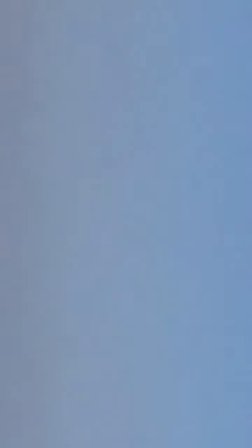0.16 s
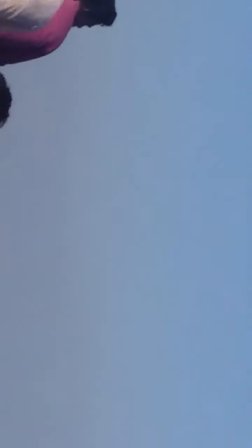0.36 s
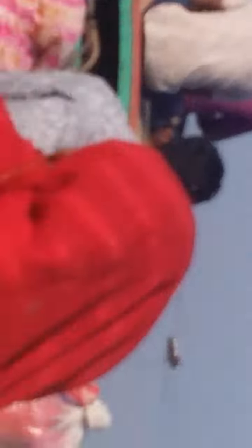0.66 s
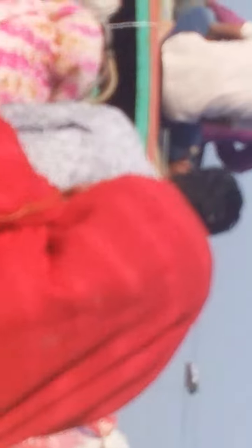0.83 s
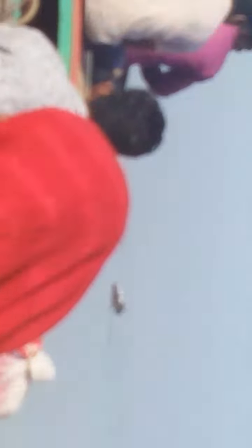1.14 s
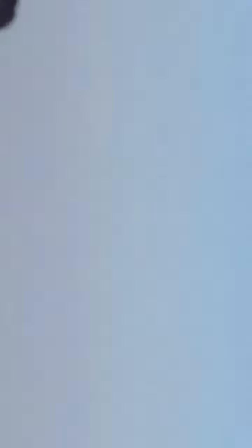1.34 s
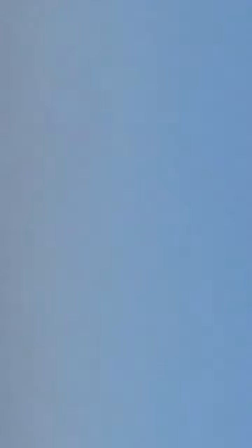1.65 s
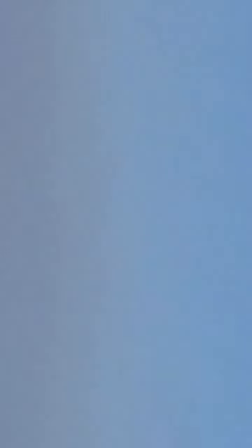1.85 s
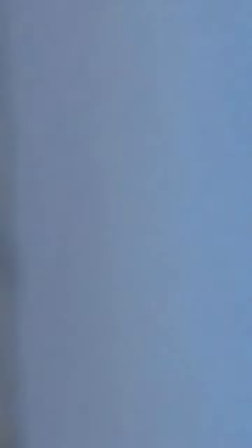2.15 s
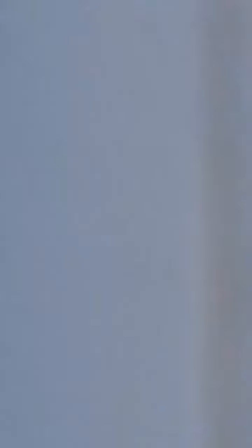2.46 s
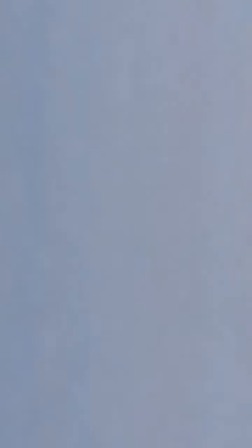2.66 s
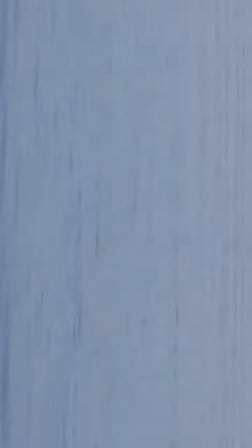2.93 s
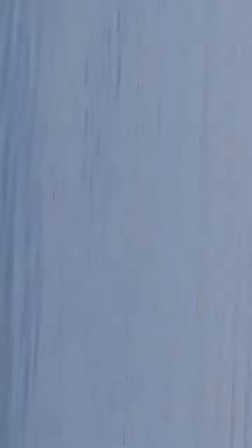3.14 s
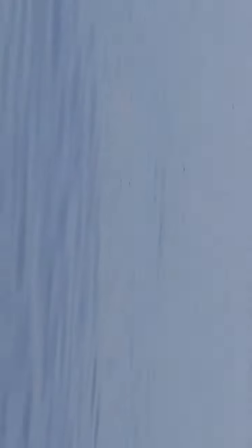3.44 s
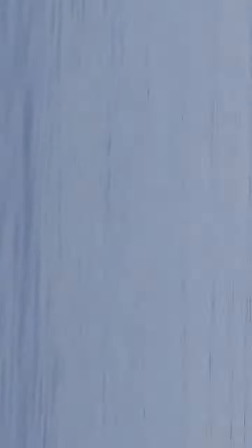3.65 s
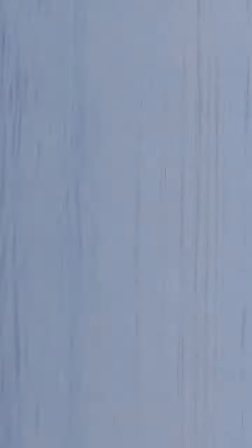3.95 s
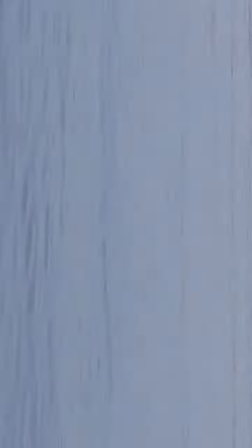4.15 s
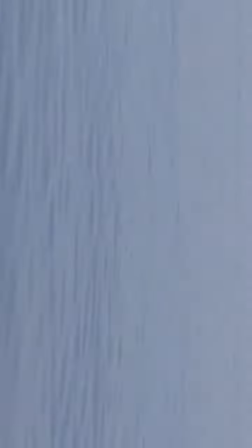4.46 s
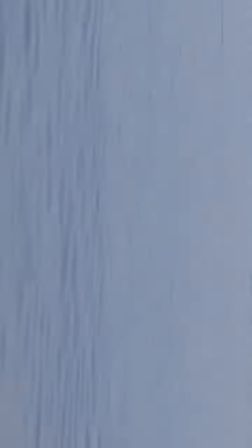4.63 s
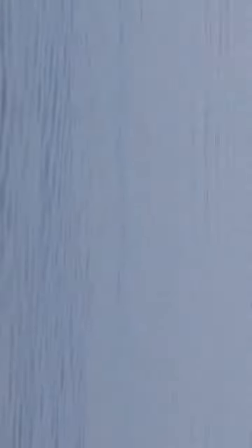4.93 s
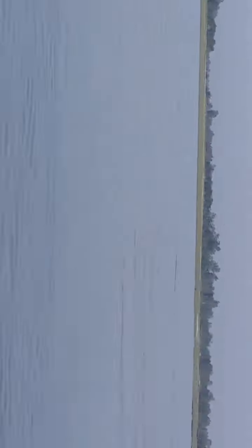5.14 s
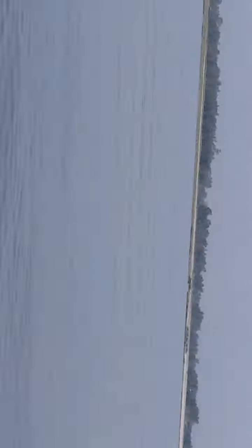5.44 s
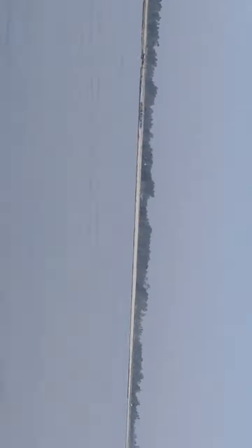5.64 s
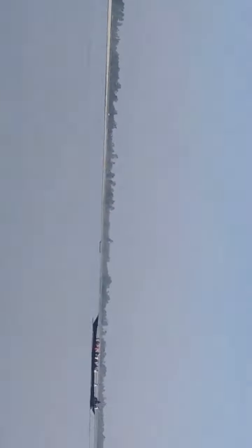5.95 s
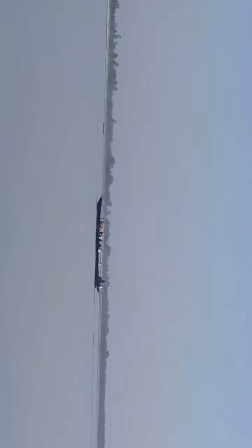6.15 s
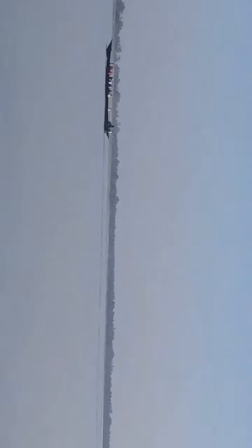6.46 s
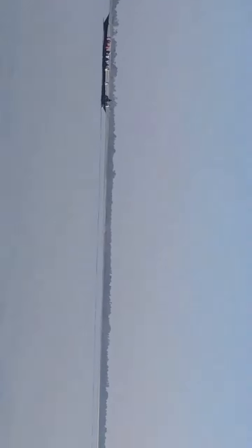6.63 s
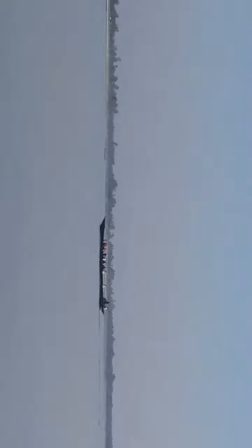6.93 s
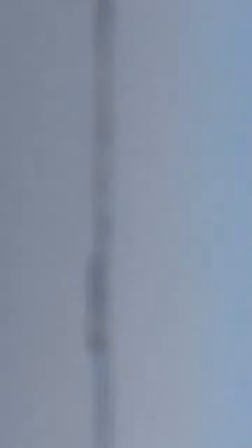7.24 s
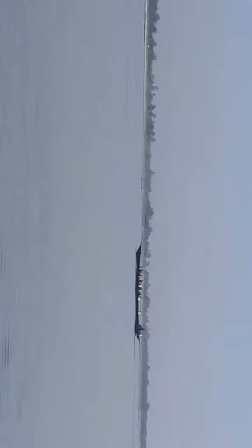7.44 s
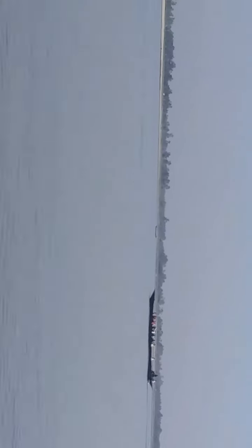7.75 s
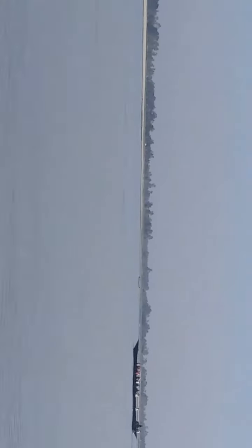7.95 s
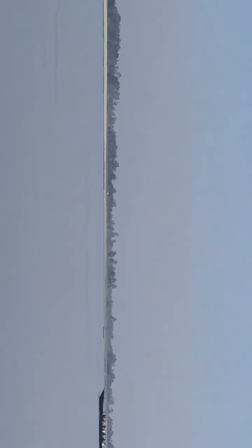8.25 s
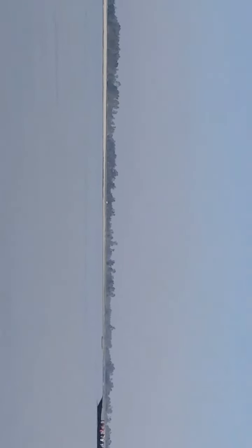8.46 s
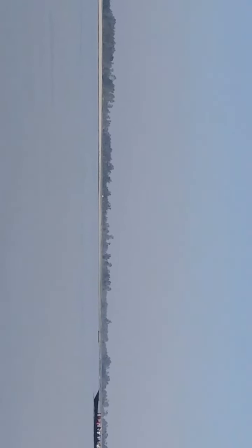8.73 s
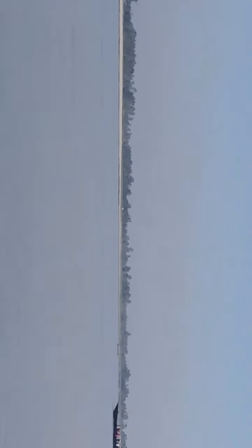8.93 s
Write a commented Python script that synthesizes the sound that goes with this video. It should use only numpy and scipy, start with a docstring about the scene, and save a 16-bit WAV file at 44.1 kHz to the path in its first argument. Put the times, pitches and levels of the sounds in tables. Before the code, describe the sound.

Aboard a wooden river boat, a loud even diesel drone with rapid knocking and wash, its bass easing as sharp clatter comes forward.

```python
"""At once a bass exhaust drone and hard diesel knocking, about fifteen knocks a second, over a rush of water.
On board a wooden river boat at an even speed, one cylinder, heard by a hand-held phone that turns to the engine.
The drone is a stack of sines; knock, valve ticks and panels are clicks through resonances; wash is shaped noise.
As the phone turns, bass sinks and treble rises; its small microphone thins the deep bass and squeezes peaks."""
import sys
import numpy as np
from scipy import signal
from scipy.io import wavfile
from scipy.ndimage import uniform_filter1d

SR = 44100
rng = np.random.default_rng(int(sys.argv[2]) if len(sys.argv) > 2 else 0)


def generate_wav(signal):
    """Clip the signal to [-1, 1] and save it as 16-bit WAV at the path in sys.argv[1]."""
    frames = np.transpose(np.atleast_2d(signal))
    scaled = np.clip(frames, -1, 1) * 32767
    pcm = np.round(scaled).astype(np.int16)
    wavfile.write(sys.argv[1], SR, pcm)


N = 400858  # samples, about 9.1 s
FIRINGS_PER_S, FIRST_S = 15.367, -.001  # even beat; time of the first firing before drift


def gain_of(db):
    """Decibels to an amplitude factor."""
    return 10 ** (np.asarray(db) / 20)


def evened(x):
    """Scaled to rms 1."""
    return x / np.sqrt(np.mean(x ** 2) + 1e-20)


def curve(points):
    """A time table read sample by sample, straight lines between its points."""
    s, value = np.transpose(points)
    return np.interp(np.arange(N) / SR, s, value)


def read_spectrum(points, hz):
    """A spectrum table read on a log-frequency axis."""
    f, value = np.transpose(points)
    return np.interp(np.log(hz + 1), np.log(f + 1), value)


def between(away_db, facing_db, facing):
    """Level for the way the phone points, mixed in decibels between its two extremes."""
    return away_db + facing * (facing_db - away_db)


def wander(hz):
    """Slow random drift, near rms 1: sines of random phase from hz / 20 up to hz."""
    t = np.arange(N // 64 + 2) * 64 / SR  # coarse steps suffice for slow motion
    slow = np.zeros(len(t))
    for f in np.geomspace(hz / 20, hz, 16):
        slow += np.sin(2 * np.pi * (f * t + rng.random())) / np.sqrt(f)
    return np.interp(np.arange(N) / SR, t, evened(slow))


def resonate(x, hz, width):
    """Two passes of a resonance with gain 1 at its peak; width in Hz is that of one pass."""
    b, a = signal.iirpeak(hz, hz / width, SR)
    once = signal.lfilter(b, a, x)
    return signal.lfilter(b, a, once)


def blows(cycles, ms, late_ms, spread_db):
    """One click a cycle, ms after firing, with random scatter in time and strength."""
    turns = cycles - ms / 1000 * FIRINGS_PER_S
    padded = np.r_[turns[0] - .05, turns]  # catches a blow just at the start
    at = np.flatnonzero(np.diff(np.floor(padded)))
    chance = rng.standard_normal((len(at), 2))
    shift = np.round(late_ms * chance[:, 0] * SR / 1000).astype(int)
    train = np.zeros(N)
    train[np.clip(at + shift, 0, N - 1)] = gain_of(spread_db * chance[:, 1])
    return train


def burst(train, t60, rise_ms, alike):
    """Noise that rises at each click, holds, then dies 60 dB in t60 s; a share of its power repeats exactly."""
    hold_s = 0.0021  # counted from the click
    t = np.arange(4096) / SR
    rise = 1 - np.exp(-(t * 1000 / rise_ms) ** 2)
    shape = rise * gain_of(-60 * np.maximum(t - hold_s, 0) / t60)
    same = signal.oaconvolve(train, shape * rng.standard_normal(4096))[:N]
    fresh = signal.oaconvolve(train, shape)[:N] * rng.standard_normal(N)
    return np.sqrt(alike) * same + np.sqrt(1 - alike) * fresh


# drift of the firings about the even beat: t/s, lateness/ms
FIRING_DRIFT = [(0, -0.78), (.6, -0.61), (1.5, -1.034), (2.4, -1.05), (3.5, 0.47), (4.4, .42), (6.1, -.52),
                (7.4, .05), (8.25, -1.02), (9.09, -0.78)]


def engine_cycles():
    """Count of firings so far, fractions included: an even beat that drifts slightly early and late."""
    t = np.arange(N) / SR
    return (t - FIRST_S - curve(FIRING_DRIFT) / 1000) * FIRINGS_PER_S


# turning of the hand-held phone: t/s, facing (0 away - 1 towards the engine block)
PHONE_TURN = [(0, 0.037), (.45, .02), (.8, 0.075), (1.8, 0.064), (2.3, 0.15), (2.8, 0.17), (3.5, 0.49),
              (5.05, .62), (5.45, 0.75), (6.2, 0.86), (6.65, 0.99), (7.3, 0.83), (7.8, 0.89), (8.2, 0.8),
              (9.09, 0.88)]
# layer levels at the phone: facing (0-1), then drone, knock, valves, panels and wash level/dB
LAYER_LEVELS = [(0, -16.5, -32, -25, -27.5, -26.5), (.14, -17.5, -30, -23.5, -27, -28),
                (.58, -21, -30.7, -24.2, -27.5, -29.5), (.8, -22.5, -28, -21.4, -24.4, -27.5),
                (1, -23, -26.6, -19.5, -24, -26.5)]


def phone_pan():
    """Which way the phone points, and the level in dB of each layer that follows from it."""
    facing = curve(PHONE_TURN)
    turn, *layers = np.transpose(LAYER_LEVELS)
    return facing, [np.interp(facing, turn, db) for db in layers]


# exhaust tones: multiple of the firing rate, relative level/dB facing away, relative level/dB facing the engine
EXHAUST_TONES = [(4, -43, -46.5), (5, -27, -34.5), (6, -38, -44), (7, -28, -29), (8, -20.5, -26),
                 (9, -43, -43), (10, -23, -32.5), (11, -29.5, -38), (12, -44, -50.5), (13, -39.5, -40.5),
                 (14, -30, -41.5), (15, -34, -42.5), (16, -52, -50), (17, -31.5, -37), (18, -34.5, -36.5),
                 (19, -43.5, -47.5), (20, -43.5, -43), (21, -36.5, -47), (24, -41, -49.5), (25, -36, -54.5),
                 (26, -39.5, -53.5), (28, -49, -44.5), (29, -42, -56)]


def drone(level_db, facing, cycles):
    """Exhaust puffs through pipe and hull: sines on multiples of the firing rate, each wavering alone."""
    puff_delay_ms, smear_turns = 21.5, .07  # smear: turns of phase per squared multiple
    out = np.zeros(N)
    for order, away_db, facing_db in EXHAUST_TONES:
        # the smear keeps the tones from peaking together, which evens out the throb
        turns = smear_turns * order ** 2 - order * FIRINGS_PER_S * puff_delay_ms / 1000
        tone_db = between(away_db, facing_db, facing) + .8 * wander(hz=2.5)
        phase = 2 * np.pi * (order * cycles + turns) + .12 * wander(hz=4)
        out += gain_of(tone_db) * np.cos(phase)
    # level held even over two half-second averages
    power = uniform_filter1d(uniform_filter1d(out ** 2, size=SR // 2), size=SR // 2)
    return gain_of(level_db) * out / np.sqrt(power)


# block resonances: f/Hz, width/Hz, relative level/dB facing away, the same facing the engine,
# 60 dB decay t/s, rise t/ms
BLOCK_MODES = [(452, 460, -3.5, -15, 0.043, 1.1), (1230, 640, -2.5, -10, 0.037, 1.3),
               (1760, 800, -3.5, -5.5, 0.041, 1.75), (2667, 1000, 1, 0.5, 0.034, 0.92),
               (3293, 900, 0, 2, 0.033, 0.66), (4170, 1150, -8.5, -5.5, 0.036, 1),
               (5580, 2900, -18, -37, 0.03, 1.6), (7970, 2400, -17, -14, 0.028, 2.4),
               (10900, 5000, -15, -12, 0.016, 2.2)]


def knock(level_db, facing, cycles):
    """Combustion hammers the block; every resonance is struck a bit differently each time."""
    train = blows(cycles, 0, late_ms=.5, spread_db=1.12)
    out = np.zeros(N)
    for hz, width, away_db, facing_db, t60, rise_ms in BLOCK_MODES:
        struck = train * gain_of(1.6 * rng.standard_normal(N))
        rattle = burst(struck, t60, rise_ms, alike=0.24)
        ring = evened(resonate(rattle, hz, width))
        out += gain_of(between(away_db, facing_db, facing)) * ring
    return gain_of(level_db) * out


# valve ticks: t/ms after firing, f/Hz, width/Hz, relative level/dB facing away, the same facing the engine,
# 60 dB decay t/s, share of power alike each cycle (0-1)
VALVE_TICKS = [(52.5, 1164, 490, -24, -14.5, 0.028, .7), (52.3, 2600, 1900, -19, -16.5, 0.016, 0.21),
               (35.7, 11300, 3800, -31, -23.5, 0.045, .2), (36, 5500, 5100, -28, -22, 0.073, 0.16),
               (15.9, 8900, 4000, -30, -35, 0.042, 0.22), (50.4, 8400, 6400, -37, -29, 0.027, .2),
               (16, 3400, 1100, -16, -33, 0.051, 0.24)]


def valves(level_db, facing, cycles):
    """Valve gear: short noisy ticks at set places of the cycle, ringing in broad bands."""
    out = np.zeros(N)
    for ms, hz, width, away_db, facing_db, t60, alike in VALVE_TICKS:
        train = blows(cycles, ms, late_ms=.15, spread_db=2.0)
        rattle = burst(train, t60, rise_ms=0.98, alike=alike)
        ring = evened(resonate(rattle, hz, width))
        out += gain_of(between(away_db, facing_db, facing)) * ring
    return gain_of(level_db) * out


# casing and hull panels: t/ms after firing, f/Hz, width/Hz, relative level/dB facing away, the same facing
PANEL_MODES = [(3.11, 515, 20.5, -15.5, -21), (2.93, 575, 17, -11.5, -20.5), (30.03, 630, 48, -16.5, -25),
               (30.09, 706, 20, -21, -27), (40.21, 758, 20.4, -11.5, -18), (3, 806, 13, -15.5, -23.5),
               (54, 800, 20, -20, -22.5), (54, 928, 52, -9, -12.5), (2.93, 1014, 23, -25, -19.5),
               (54, 1095, 31, -17.5, -24), (54, 1130, 37, -15, -17.5), (54, 1175, 32, -24, -17.5),
               (2.94, 1295, 65, -12, -19.5), (54, 1350, 30, -14, -31)]


def panels(level_db, facing, cycles):
    """Nearly even blows on ringing casing and hull panels give steady lines of pitch."""
    out = np.zeros(N)
    for ms, hz, width, away_db, facing_db in PANEL_MODES:
        train = blows(cycles, ms, late_ms=.03, spread_db=1.0)
        ring = evened(resonate(train, hz, width))
        out += gain_of(between(away_db, facing_db, facing)) * ring
    return gain_of(level_db) * out


# colour of the wash with the phone facing away: f/Hz, relative level/dB per Hz
WASH_COLOUR_AWAY = [(20, -29), (40, -26), (60, -18), (100, -8), (160, -10), (280, -15.5), (520, -20),
                    (700, -20.5), (1000, -19.5), (1800, -26.5), (3200, -27), (4500, -29.5), (5500, -37.5),
                    (7200, -41.5), (8600, -47.5), (10500, -43), (14000, -54)]
# colour of the wash with the phone facing the engine: f/Hz, relative level/dB per Hz
WASH_COLOUR_FACING = [(20, -24), (40, -27), (60, -21), (100, -6), (160, -9.5), (280, -14.5), (520, -19.5),
                      (680, -20), (1000, -16), (1600, -18), (3300, -18.5), (4500, -23), (5500, -36.5),
                      (7000, -36.5), (9500, -39), (11600, -38), (14000, -52)]


def wash(level_db, facing, cycles):
    """Patchy roar of hull and wake: coloured noise, strongest at each firing and sinking until the next."""
    hop, size = 512, 2048
    frames, hz = N // hop + 5, np.fft.rfftfreq(size, 1 / SR)
    real, imag, patches = rng.standard_normal((frames, len(hz), 3)).T
    # smoothed over frames, then frequency, so that strong and weak patches form
    patches = uniform_filter1d(uniform_filter1d(patches, size=28, axis=0), size=3, axis=1)
    turn = facing[np.minimum(np.arange(frames) * hop, N - 1)]
    away_db = read_spectrum(WASH_COLOUR_AWAY, hz)[:, None]
    facing_db = read_spectrum(WASH_COLOUR_FACING, hz)[:, None]
    colour_db = between(away_db, facing_db, turn)
    spectrum = (real + 1j * imag) * gain_of(colour_db + 1.5 * evened(patches))
    # the level is evened and set by the band from 1 to 5 kHz
    band_power = (abs(spectrum[46:232]) ** 2).sum(0)
    spectrum /= np.sqrt(uniform_filter1d(band_power, size=40))
    roar = signal.istft(spectrum, nperseg=size, noverlap=size - hop)[1][:N]
    band = signal.sosfilt(signal.butter(4, [1000, 5000], "band", fs=SR, output="sos"), roar)
    throb_db = -3.0 * (cycles % 1 - .5)
    return gain_of(level_db + throb_db) * roar / np.std(band)


def scene():
    """Every layer follows the same turning of the phone and the same engine cycle."""
    facing, levels_db = phone_pan()
    cycles = engine_cycles()
    layers = (drone, knock, valves, panels, wash)
    return sum(layer(db, facing, cycles) for layer, db in zip(layers, levels_db))[None]


# slow waver of the treble above 5 kHz: t/s, level/dB
TREBLE_WAVER = [(0, -1), (.5, -2), (1.05, 2), (1.3, -1.8), (2.2, 1), (3, -.3), (3.7, 1.4), (4.4, 0.5),
                (6, 0.7), (7, -.5), (9.09, 0)]


def record(dry):
    """The treble wavers; the small microphone squeezes peaks unevenly and loses deep bass; then the band limit."""
    treble = signal.sosfiltfilt(signal.butter(2, 5000, "high", fs=SR, output="sos"), dry)
    shaded = dry + (gain_of(curve(TREBLE_WAVER)) - 1) * treble
    # upward peaks are squeezed harder than downward ones
    bent = np.where(shaded > 0, .55 * np.tanh(shaded / .55), .75 * np.tanh(shaded / .75))
    thin = signal.sosfilt(signal.butter(2, 32, "high", fs=SR, output="sos"), bent)
    band_limit = signal.firwin(511, 13900, window=("kaiser", 9), fs=SR)  # low-pass, edge in Hz
    return signal.oaconvolve(thin, band_limit[None], "same")


dry = scene()
out = record(dry)
generate_wav(out)
```